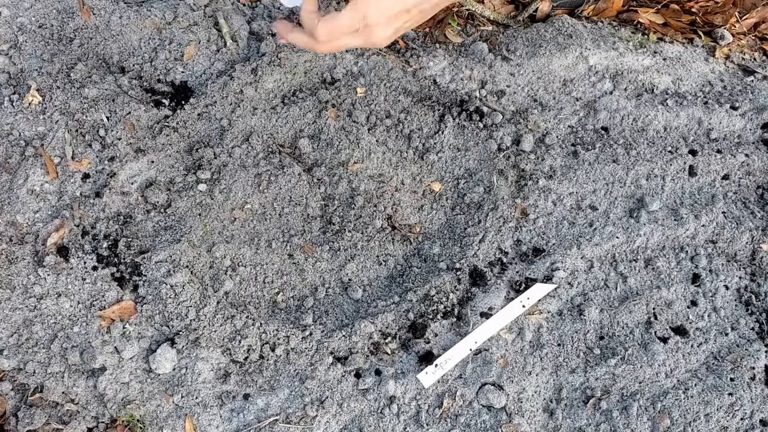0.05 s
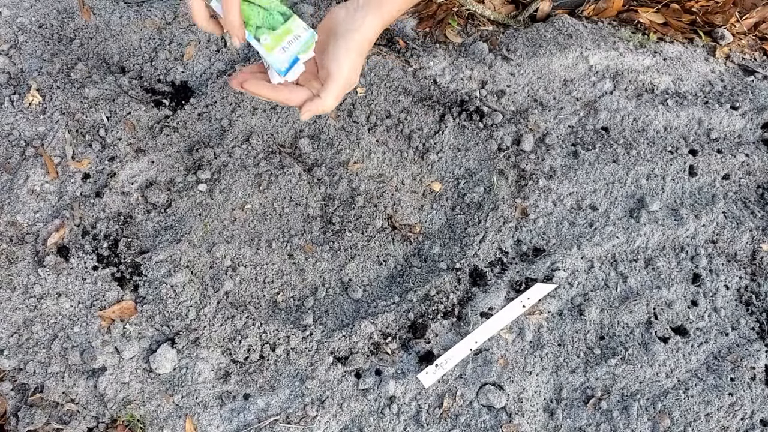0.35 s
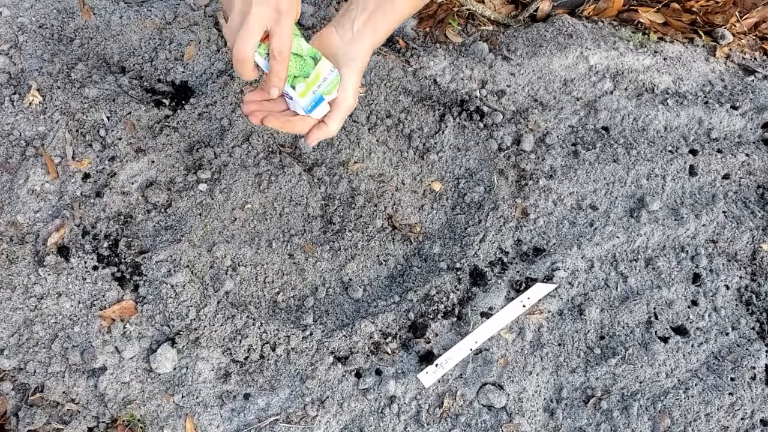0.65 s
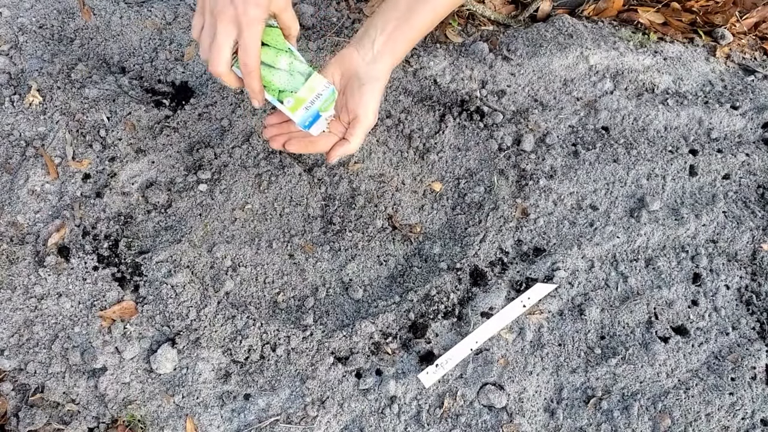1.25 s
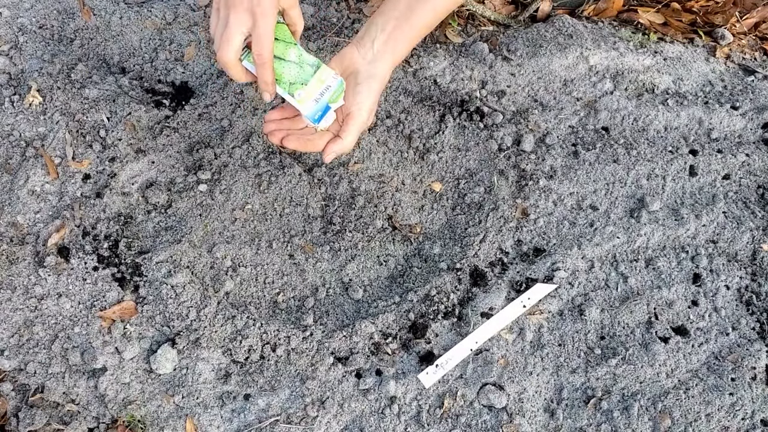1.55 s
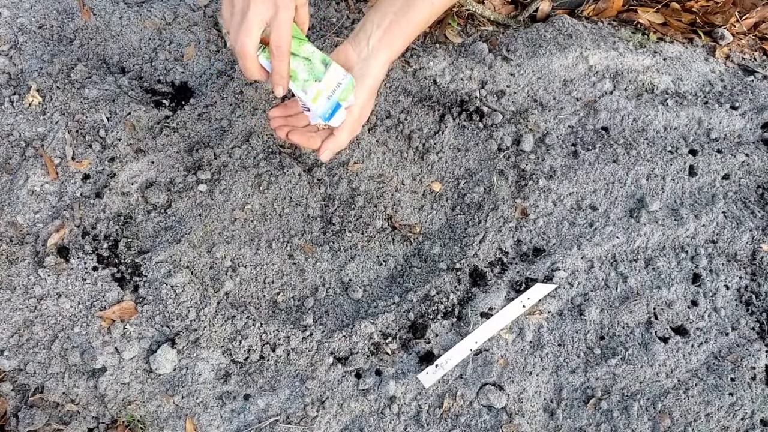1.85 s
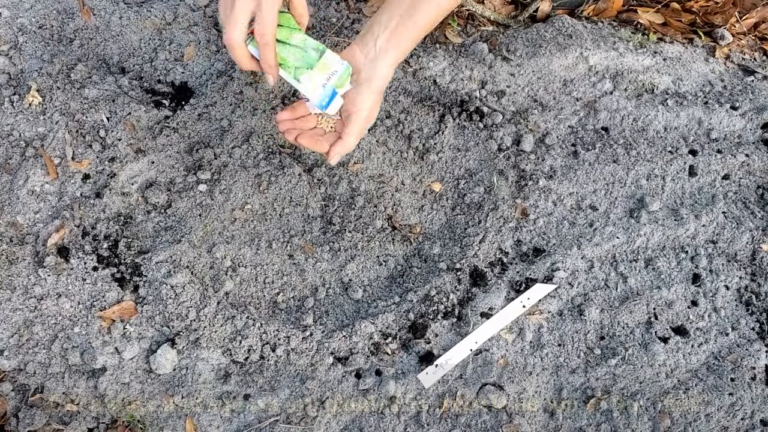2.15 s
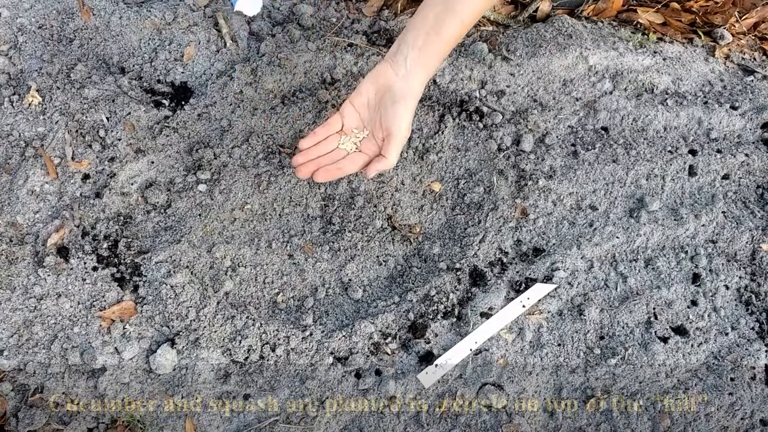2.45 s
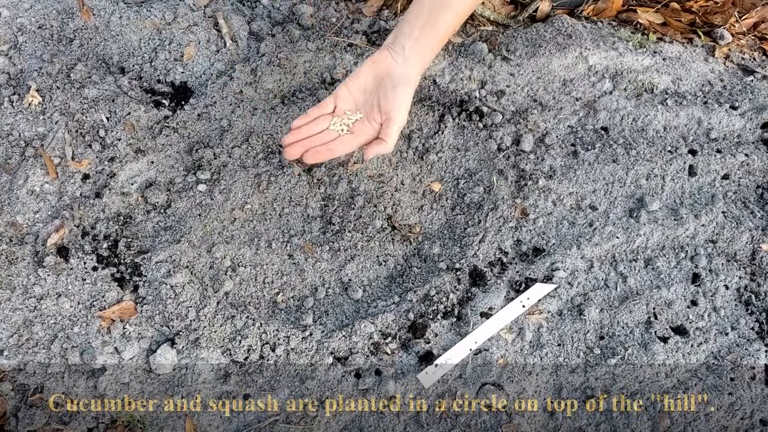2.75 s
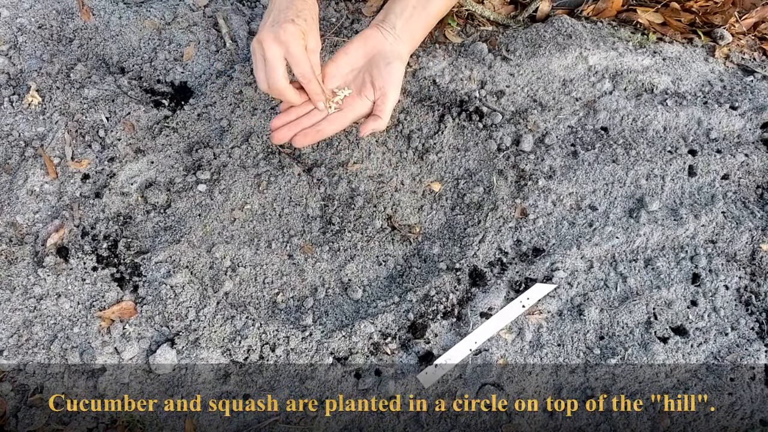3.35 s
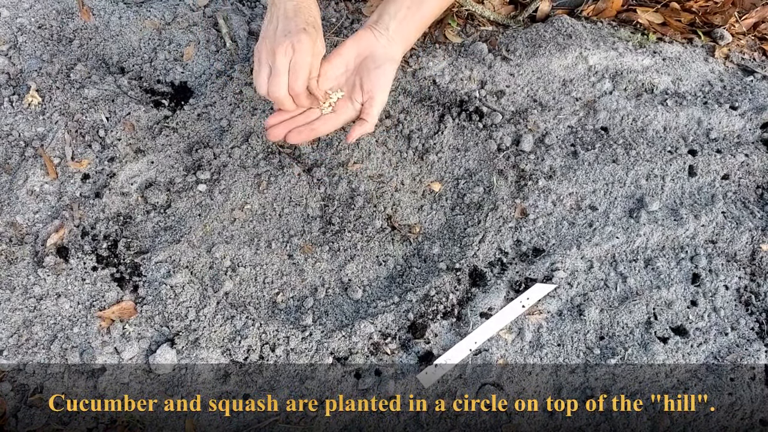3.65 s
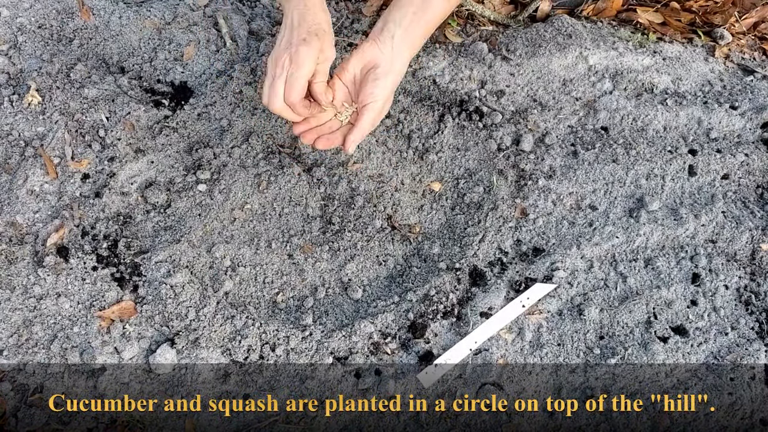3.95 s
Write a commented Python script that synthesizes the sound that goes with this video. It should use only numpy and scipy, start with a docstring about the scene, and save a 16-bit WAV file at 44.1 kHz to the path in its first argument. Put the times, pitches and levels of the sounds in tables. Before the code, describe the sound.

A paper seed packet rustles as seeds slide out, with wind on the microphone.

```python
"""Outdoors, wind buffets the microphone throughout; its eddies pop mainly on the left port.
Fingers rub a paper packet. From 0.4 to 0.9 s seeds slide out toward a palm, scraping, tumbling
and ringing the air in the packet. Until about 3 s the handled paper rubs and its creases tick.
Small, distant birds whistle from the start; after 2 s they sing higher and add hoarse trills."""
import sys
import numpy as np
from scipy import signal
from scipy.fft import rfft, irfft, next_fast_len
from scipy.io import wavfile
from scipy.ndimage import map_coordinates

SR = 44100
rng = np.random.default_rng(int(sys.argv[2]) if len(sys.argv) > 2 else 0)


def to_wav(s):
    """Save 16-bit WAV."""
    ch = np.atleast_2d(s).T  # columns
    pcm = np.round(np.clip(ch, -1, 1) * 32767)  # PCM
    wavfile.write(sys.argv[1], SR, pcm.astype(np.int16))


N = 176400

# seed flow: t/s, rel. scrape level/dB, rel. cavity level/dB
SLIDE_LEVELS = [(.42, -73, -64), (.48, -64, -58), (.57, -58, -53), (.61, -55, -51), (.68, -48, -52),
                (.755, -45.5, -54), (.785, -52, -57), (.83, -57, -68), (.86, -60, -74), (.9, -76, -80)]
# paper scrape: f/Hz, level/dB
SCRAPE_SPECTRUM = [(1000, -47.5), (1700, -11.5), (2130, -2.5), (2840, 4), (3420, -4.5), (3940, -12),
                   (5300, -6), (5770, 1.5), (6330, -3.5), (7780, -12), (9110, -24.5), (12200, -15),
                   (15800, -20)]
# air resonance in the packet: f/Hz, level/dB
CAVITY_SPECTRUM = [(700, -24.5), (1130, -11.5), (1370, 1.5), (1520, -2), (1700, -16), (2600, -36.5)]
def seed_slide(scrape_gain_db=-1.5, tumble_gain_db=-6, cavity_gain_db=-1):
    """Seeds scrape and tumble down the paper and ring the air in the packet."""
    times_s, seeds_db, cavity_db = np.transpose(SLIDE_LEVELS)
    level = lambda db: amp(np.interp(clock(), times_s, db, left=-120, right=-120))
    seeds = amp(scrape_gain_db) * paper_friction(SCRAPE_SPECTRUM) + amp(tumble_gain_db) * seed_tumble()
    cavity = paper_friction(CAVITY_SPECTRUM)
    return level(seeds_db) * seeds + level(cavity_db + cavity_gain_db) * cavity


def seed_tumble(contacts_per_s=1600, centre_hz=4300, log_spread=0.22, scatter_db=4.2, decay_cycles=2):
    """Each contact rings briefly with its own pitch, strength and side."""
    count, t = int(contacts_per_s * N / SR), np.arange(SR // 200) / SR
    pitch, size, side = np.clip(rng.standard_normal((count, 3)), -2, 2).T[..., None]
    cycles = centre_hz * np.exp(log_spread * pitch) * t
    rings = amp(scatter_db * size) * np.sin(2 * np.pi * cycles) * np.exp(-cycles / decay_cycles)
    indices = (rng.integers(N, size=(count, 1)) + np.arange(len(t))).ravel()
    panned = [rings * amp(2 * port * side) for port in (1, -1)]
    return unit(np.array([np.bincount(indices, channel.ravel(), N)[:N] for channel in panned]))


# paper stereo image: f/Hz, L-R correlation
PAPER_CORRELATION = [(1000, 1), (3000, 0.53), (7000, 0.22), (10000, 0.98), (15000, .9)]
def paper_friction(spectrum, slips_per_s=1300, slip_db=-4, stick_db=2.04, stick_hz=128.5):
    """Fine slips over a smooth hiss, catching and letting go."""
    slips = rng.standard_normal((2, N)) + amp(slip_db) * impulses(slips_per_s)
    grip = amp(stick_db * wobble(stick_hz))
    return coloured(slips * grip, spectrum, PAPER_CORRELATION)


# finger strokes: t/s, rise/s, fall/s, scrape level/dB, hiss level/dB
STROKES = [(-.01, 0.078, 0.03, -58, -55), (1.17, 0.088, 0.049, -59, -83), (1.33, 0.044, 0.38, -71.5, -69.5),
           (1.811, 0.016, 0.071, -61.5, -64), (2.66, 0.0085, 0.1, -55, -56),
           (2.76, 0.043, 0.17, -63.5, -62)]
# paper treble: f/Hz, level/dB
HISS_SPECTRUM = [(3000, -18.5), (5500, -18.5), (7300, 4.5), (9000, -11), (11500, -2.5), (15000, -3.5)]
def finger_rubs(cavity_db=-5.5):
    """Short strokes scrape the paper and ring the air inside."""
    scrape = paper_friction(SCRAPE_SPECTRUM) + amp(cavity_db) * paper_friction(CAVITY_SPECTRUM)
    hiss = paper_friction(HISS_SPECTRUM)
    rubs = np.zeros((2, N))
    for start_s, rise_s, fall_s, scrape_db, hiss_db in STROKES:
        envelope = np.interp(clock() - start_s, [0, rise_s, rise_s + fall_s], [0, 1, 0])
        rubs += envelope * (amp(scrape_db) * scrape + amp(hiss_db) * hiss)
    return rubs


# crease and seed ticks: t/s, rel. level/dB, rel. treble level/dB
TICK_EVENTS = [(0.038, -40, -23), (.602, -41, -32.5), (0.64, -40, -25.5), (.757, -36.5, -28),
               (0.79, -31, -22.5), (0.803, -33.5, -24), (0.812, -28, -24), (0.853, -33.5, -23),
               (0.895, -46, -14), (.941, -56, -13.5), (1.09, -44, -26), (1.191, -33, -28.5),
               (1.215, -38.5, -29), (1.239, -37, -29.5), (1.269, -31.5, -33.5), (1.298, -33, -36),
               (1.815, -36.5, -29.5), (2.062, -48.5, -11), (2.093, -39.5, -20), (2.667, -26.5, -28),
               (2.707, -30, -29), (2.714, -33.5, -16.5)]
# paper response to a tick: f/Hz, level/dB
TICK_SPECTRUM = [(400, -6.5), (900, -1), (1450, 3.5), (1900, -4), (3000, 5), (3900, -5.5), (4800, -1),
                 (5900, -6), (7600, -8.5), (9000, -42), (15000, -30)]
def paper_ticks(gain_db=14, treble_gain_db=11, t60_s=0.021, snap_ratio=2.7):
    """Creases and seeds snap; the paper damps the rattle at once."""
    body, treble = np.zeros((2, 2, N))
    t = np.arange(SR // 20) / SR
    for start_s, db, treble_db in TICK_EVENTS:
        rattle = rng.standard_normal((2, len(t))) * amp(-60 * t / t60_s)
        tick = rattle + snap_ratio * (t == 0)
        tick *= amp(db + gain_db) / np.linalg.norm(tick[0])
        span = round(start_s * SR) + np.arange(len(t))
        body[:, span] += tick
        treble[:, span] += tick * amp(treble_db + treble_gain_db)
    body = stereo(body, TICK_SPECTRUM, PAPER_CORRELATION)
    return body + stereo(treble, HISS_SPECTRUM, PAPER_CORRELATION)


# slow gusts: t/s, rel. level/dB
GUST_LEVELS = [(0, -29), (.3, -23), (.48, -23.5), (.66, -28), (.82, -21), (1.27, -23), (1.41, -33),
               (1.5, -26), (1.75, -24), (2.3, -26), (2.4, -31), (2.52, -25), (2.85, -25), (2.97, -37),
               (3.06, -23), (3.3, -24), (3.68, -32), (3.82, -23), (4, -28)]
# gust rumble: f/Hz, level/dB
GUST_SPECTRUM = [(15, -21), (30, -13), (50, -2), (77, 1), (110, -7), (160, -15), (250, -28), (700, -96)]
# gust stereo image: f/Hz, L-R correlation
GUST_CORRELATION = [(60, 0.54), (130, 0.37), (300, 0.076)]
# small, fast eddies: t/s, rel. level/dB
EDDY_LEVELS = [(0, -32), (.47, -32), (.55, -43), (.73, -42), (.97, -32), (1.28, -33.5), (1.41, -47),
               (1.49, -33), (1.62, -35), (1.78, -25), (1.92, -25.5), (1.97, -37), (2.18, -33), (2.42, -47),
               (2.76, -31), (2.97, -49), (3.08, -32), (3.4, -32), (3.65, -45), (3.81, -27), (4, -39)]
# eddy colour: f/Hz, level/dB
EDDY_SPECTRUM = [(40, -18), (90, 11.5), (130, -0.5), (190, 0.5), (260, -5.5), (340, -11), (450, -24.5),
                 (700, -32), (1100, -42.5), (2500, -82)]
# eddy stereo image: f/Hz, L-R correlation
EDDY_CORRELATION = [(100, 0.95), (260, -0.62), (700, -0.48)]
def wind(shed_hz=10.1, shed_db=3.2, drift_cycles=0.3, eddies_per_s=400, gust_db=-1.6, eddy_db=0.5):
    """Gusts and small eddies pulse together as vortices shed from the microphone's housing."""
    flutter = lambda depth_db, hz: amp(depth_db * np.clip(wobble(hz), -3, 1))
    cycles = shed_hz * clock() + drift_cycles * wobble(4.132)
    shedding = amp(shed_db * np.sin(2 * np.pi * cycles))
    pulsing = unit(shedding * np.array([flutter(depth_db=2.5, hz=15) for _ in range(2)]))
    rumble = unit(pulsing * noise(GUST_SPECTRUM, GUST_CORRELATION))
    bursts = pulsing * flutter(depth_db=1.5, hz=44.76)
    eddies = coloured(impulses(eddies_per_s) * bursts, EDDY_SPECTRUM, EDDY_CORRELATION)
    level = lambda points: amp(np.interp(clock(), *np.transpose(points)))
    return (amp(gust_db) * level(GUST_LEVELS) * pan(left_db=1.1) * rumble
            + amp(eddy_db) * level(EDDY_LEVELS) * pan(left_db=2) * eddies)


# strong eddies: t/s, thump level/dB, puff level/dB
POP_EVENTS = [(0.053, -13.5, -34.5), (0.14, -7.5, -39.5), (0.177, -28, -38), (.197, -4.5, -41),
              (0.238, -7.5, -40.5), (0.303, -5, -42.5), (0.364, -10.5, -36), (0.399, -4, -41.5),
              (0.565, -9.5, -37.5), (.894, -10, -32.5), (.925, -15, -45.5), (.98, -7, -44),
              (1.079, -9.5, -42), (1.15, -8.5, -41), (1.19, -4.5, -39), (1.308, -30, -36),
              (1.592, -5.5, -41.5), (2.73, -15, -38), (3.372, -8, -49.5), (1.688, -2.5, -44.5),
              (1.779, -4.5, -44.5), (1.975, -17, -44), (2.067, -9.5, -42.5), (2.147, -6, -40.5),
              (2.897, -8.5, -41), (3.158, -13.5, -43), (3.266, -7, -37), (3.527, -13.5, -39.5),
              (3.861, -8.5, -41), (3.962, -9.5, -35.5)]
# puff of air at the port: f/Hz, level/dB
PUFF_SPECTRUM = [(100, -2), (400, 8.5), (800, 6.5), (1400, -14.5), (2500, -25.5), (6000, -54.5)]
def port_pops(half_width_s=0.0026, puff_decay_s=0.0086, puff_lead_s=0.0022, right_gain=-0.21):
    """Each strong eddy hits the left port with a short puff and a low thump."""
    t = clock()
    thumps, puff_envelope = np.zeros((2, N))
    for centre_s, thump_db, puff_db in POP_EVENTS:
        u = ((t - centre_s) / half_width_s) ** 2
        thumps += amp(thump_db) * (1 - u) / (1 + u / 2) ** 3  # suction, push, suction
        age_s = t - centre_s + puff_lead_s
        puff_envelope += amp(puff_db) * np.exp(-abs(age_s) / puff_decay_s) * (age_s > 0)
    thumps = signal.sosfilt(signal.butter(1, 45, "high", fs=SR, output="sos"), thumps)
    puffs = puff_envelope * noise(PUFF_SPECTRUM, [(500, 1.0)])[0]
    return (thumps + puffs) * np.array([[1], [right_gain]])


# bird stereo image: f/Hz, L-R correlation
BIRD_CORRELATION = [(2200, 1), (4300, 0.31)]
def birds(rasp_db=1.8, rasp_hz=350, echo_db=-3.5, t60_s=0.24):
    """Slightly raspy song from the left, scattered by the yard."""
    song = bird_notes() + bird_trills()
    song *= unit(amp(rasp_db * wobble(rasp_hz)))
    tail = rng.standard_normal((2, SR // 2)) * amp(-60 * clock()[:SR // 2] / t60_s)
    echo = signal.fftconvolve(song[None], tail / np.linalg.norm(tail[0]), axes=1)[:, :N]
    far_port = filtered(song, lambda hz: np.exp(1j * stereo_angle(BIRD_CORRELATION, hz)))
    return (np.array([song, far_port]) + amp(echo_db) * echo) * pan(left_db=4.5)


# whistles: t/s, length/s, start f/Hz, middle f/Hz, end f/Hz, rel. level/dB
BIRD_NOTES = [(0.034, 0.044, 2300, 2383, 2400, -61), (0.305, 0.041, 2900, 2524, 2940, -63),
              (0.374, 0.052, 2350, 2260, 2830, -61), (1.032, 0.034, 2300, 2097, 1770, -62),
              (1.084, 0.029, 2350, 2164, 1940, -62.5), (1.156, 0.042, 1750, 1810, 1870, -64),
              (1.378, 0.031, 2500, 2150, 1800, -57.5), (1.432, 0.029, 2150, 2210, 1910, -58),
              (1.494, 0.047, 1850, 1984, 2210, -61), (1.559, 0.039, 1950, 2050, 1830, -63),
              (2.07, 0.051, 3600, 4090, 4240, -65), (2.288, 0.023, 3900, 3840, 3570, -58),
              (2.367, 0.12, 6170, 5980, 5800, -69), (2.511, 0.059, 5000, 4270, 3630, -66.5),
              (2.592, 0.067, 4950, 4370, 3600, -61.5), (2.679, .11, 6450, 6500, 6720, -69),
              (2.944, 0.076, 4950, 4540, 3660, -67), (3.027, 0.064, 4900, 4700, 3780, -67),
              (3.287, 0.061, 6000, 4980, 4040, -68.5), (3.361, 0.065, 5000, 4640, 3640, -64.5),
              (3.461, 0.042, 4950, 4740, 4230, -63), (3.882, 0.048, 5300, 4640, 3440, -69),
              (3.947, 0.013, 6140, 6100, 5230, -64.5), (3.968, 0.036, 5200, 4590, 4530, -71)]
def bird_notes(waver_depth=0.014, waver_hz=370):
    """Wavering whistles glide through three pitches."""
    t, song = clock(), np.zeros(N)
    waver = 1 + waver_depth * wobble(waver_hz)
    for start_s, length_s, *pitches_hz, db in BIRD_NOTES:
        on = (t >= start_s) & (t < start_s + length_s)
        progress = (t[on] - start_s) / length_s
        glide_hz = np.polyval(np.polyfit([0, .5, 1], pitches_hz, 2), progress)
        song[on] += amp(db) * syrinx(glide_hz * waver[on], progress)
    return song


# buzzy calls: t/s, length/s, f/Hz, rel. level/dB
BIRD_TRILLS = [(2.217, 0.034, 4210, -58.5), (2.217, 0.022, 6840, -63), (2.284, 0.013, 4150, -59),
               (2.381, 0.083, 4300, -55.5), (2.79, .065, 4300, -60.5), (3.178, 0.032, 4200, -64),
               (3.233, 0.05, 4360, -58), (3.704, .026, 6300, -64.5)]
def bird_trills(beat_hz=58.4, swing=0.046, jitter_depth=0.033, jitter_hz=1800, low_ratio=0.83, low_db=-8):
    """Hoarse calls beat in level and pitch over a lower voice."""
    t, song = clock(), np.zeros(N)
    jitter = jitter_depth * wobble(jitter_hz)
    for start_s, length_s, hz, db in BIRD_TRILLS:
        on = (t >= start_s) & (t < start_s + length_s)
        age_s = t[on] - start_s
        beat = np.sin(np.pi * beat_hz * age_s) ** 2
        pitch_hz = hz * (1 + jitter[on] + swing * (2 * beat - 1.5))
        low_voice = amp(low_db) * syrinx(low_ratio * pitch_hz, age_s / length_s)
        song[on] += amp(db) * beat * (syrinx(pitch_hz, age_s / length_s) + low_voice)
    return song


def syrinx(hz, progress, second_ratio=1.22, second_db=-15):
    """Each side of the syrinx gives one tone; both swell and fade as progress runs from 0 to 1."""
    phase = 2 * np.pi * np.cumsum(hz) / SR
    envelope = np.sqrt(2 * abs(np.sin(np.pi * progress)))
    return envelope * (np.sin(phase) + amp(second_db) * np.sin(second_ratio * phase))


# outdoor hush: f/Hz, level/dB
AIR_SPECTRUM = [(240, -32.5), (400, -7), (729, -7), (1330, -13.5), (1650, -16.5), (2140, -16), (2460, -15),
                (5140, -27.5), (7910, -29), (9660, -47.5), (12400, -32.5), (15800, -38)]
# hush stereo image: f/Hz, L-R correlation
AIR_CORRELATION = [(500, -0.49), (1200, -0.71), (2100, -0.28), (3100, -0.059), (6500, 0.19), (7200, 0.58),
                   (10000, 0.86), (15000, .75)]
def outdoor_air(level_db=-56.5, drift_db=0.27, drift_hz=5):
    """A faint, nearly steady hush."""
    return amp(level_db + drift_db * wobble(drift_hz)) * noise(AIR_SPECTRUM, AIR_CORRELATION)


def amp(db):
    return 10 ** (np.asarray(db) / 20)


def unit(x):
    return x / np.sqrt(np.mean(x ** 2) + 1e-20)


def clock():
    return np.arange(N) / SR


def pan(left_db):
    return amp([[left_db], [-left_db]])


def wobble(knots_per_s):
    """Smooth random curve."""
    return map_coordinates(rng.standard_normal(2000), [clock() * knots_per_s], mode="mirror")


def impulses(per_s):
    return unit((rng.random((2, N)) < per_s / SR) * rng.standard_normal((2, N)))


def log_interp(points, hz):
    knots_hz, values = np.transpose(points)
    return np.interp(np.log(hz + 1), np.log(knots_hz + 1), values)


def filtered(x, response):
    size = next_fast_len(N + 8192)
    return irfft(rfft(x, size) * response(np.fft.rfftfreq(size, 1 / SR)), size)[..., :N]


def stereo_angle(correlation, hz):
    return np.arccos(np.clip(log_interp(correlation, hz), -1, 1))


def stereo(pair, spectrum, correlation):
    """Two independent signals to L and R with the given spectrum and correlation."""
    def response(hz):
        angle = stereo_angle(correlation, hz) / 2
        return amp(log_interp(spectrum, hz)) * [np.cos(angle), np.sin(angle)]
    mid, side = filtered(pair, response)
    return np.array([mid + side, mid - side])


def coloured(pair, spectrum, correlation):
    return unit(stereo(pair, spectrum, correlation))


def noise(spectrum, correlation):
    return coloured(rng.standard_normal((2, N)), spectrum, correlation)


def scene():
    background = outdoor_air() + wind() + port_pops() + birds()
    return seed_slide() + finger_rubs() + paper_ticks() + background


def record(dry, band_limit_hz=15850):
    """Brick-wall low-pass."""
    return filtered(dry, lambda hz: hz < band_limit_hz)


dry = scene()
out = record(dry)
to_wav(out)
```